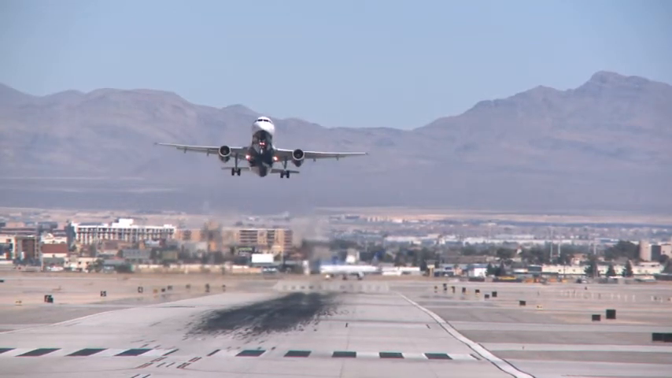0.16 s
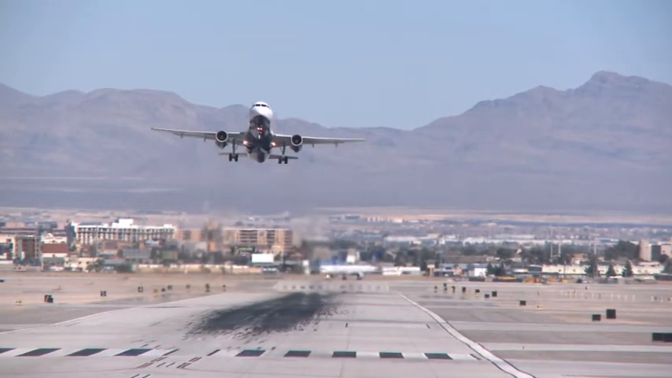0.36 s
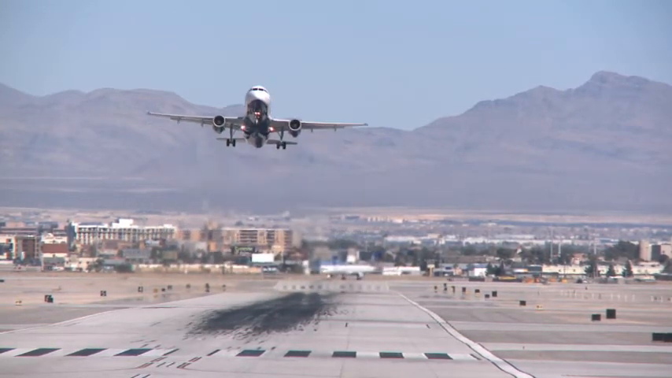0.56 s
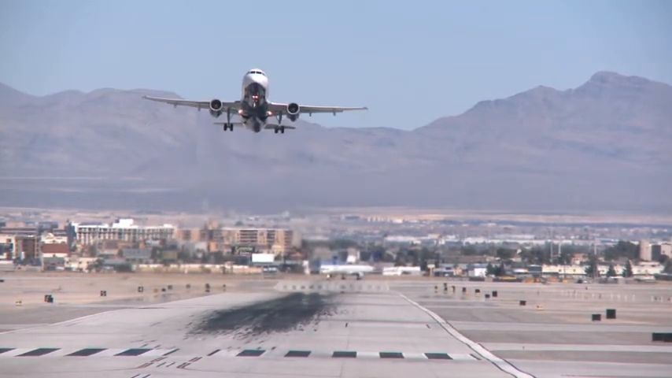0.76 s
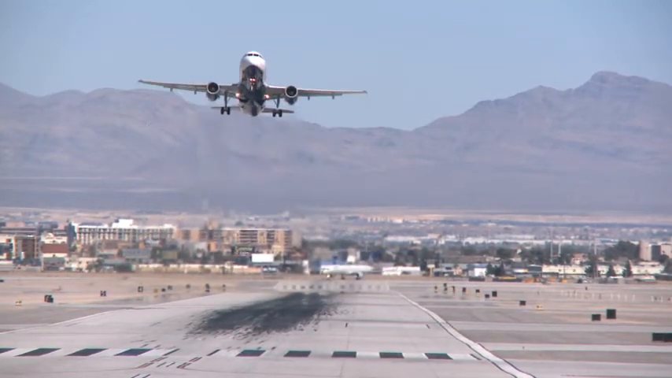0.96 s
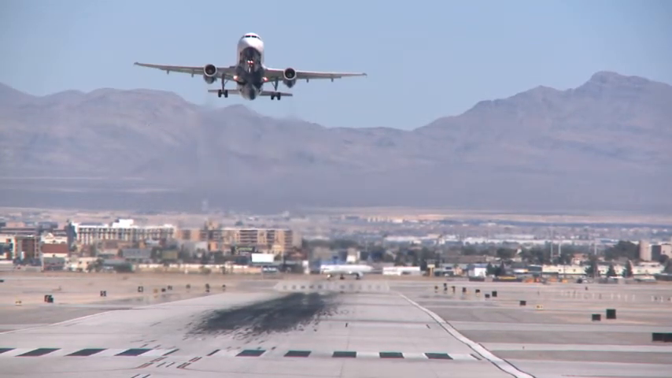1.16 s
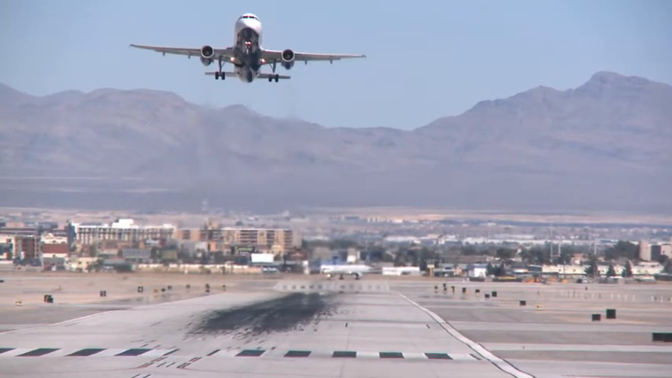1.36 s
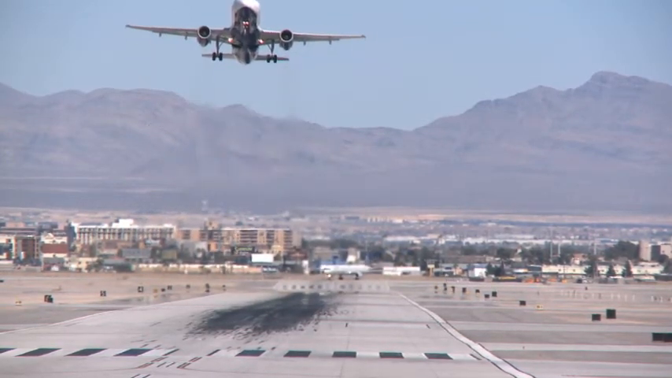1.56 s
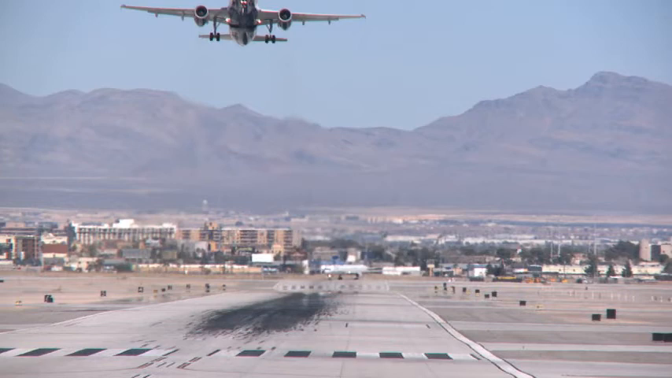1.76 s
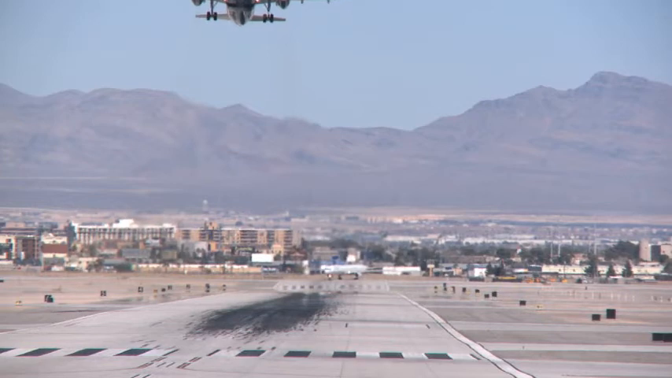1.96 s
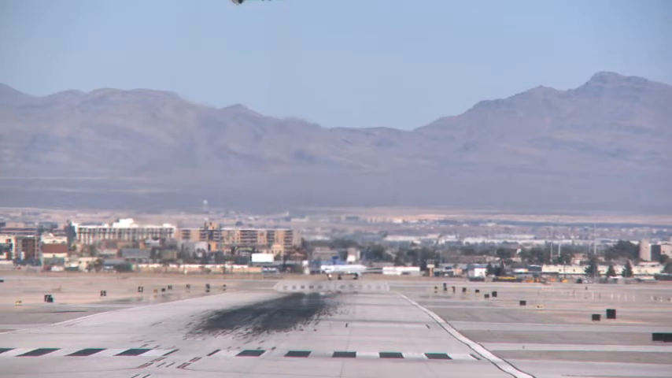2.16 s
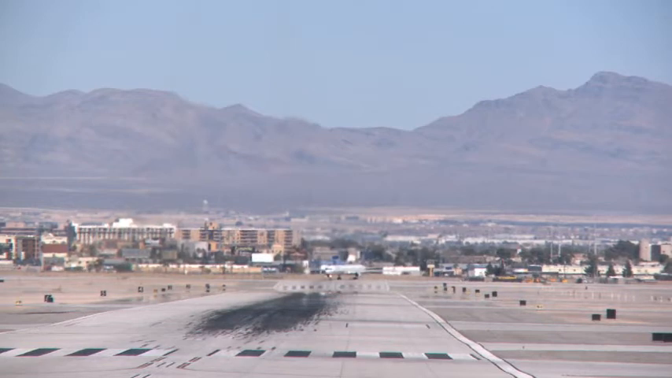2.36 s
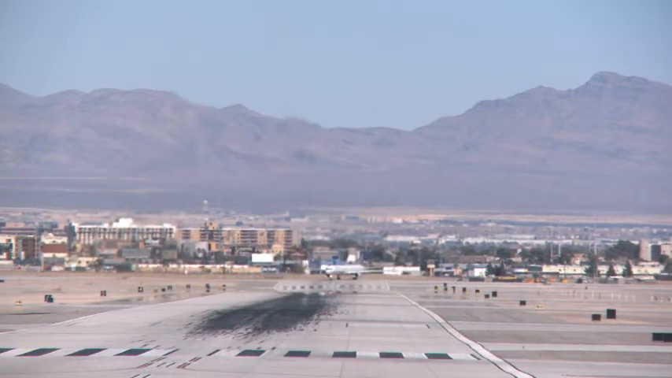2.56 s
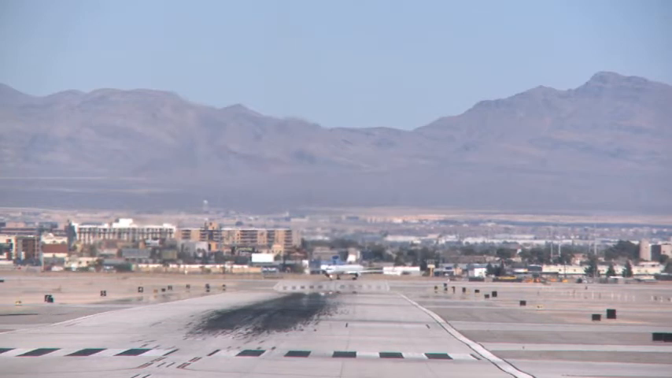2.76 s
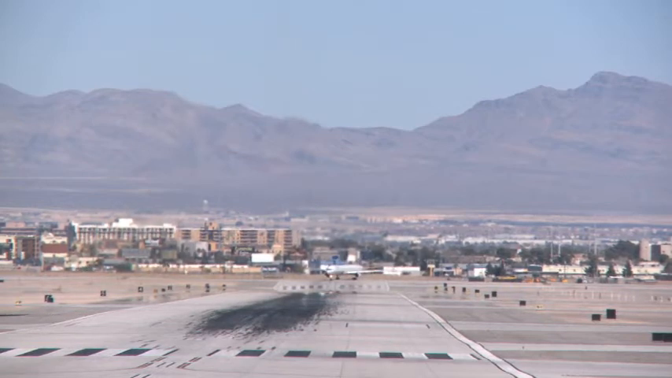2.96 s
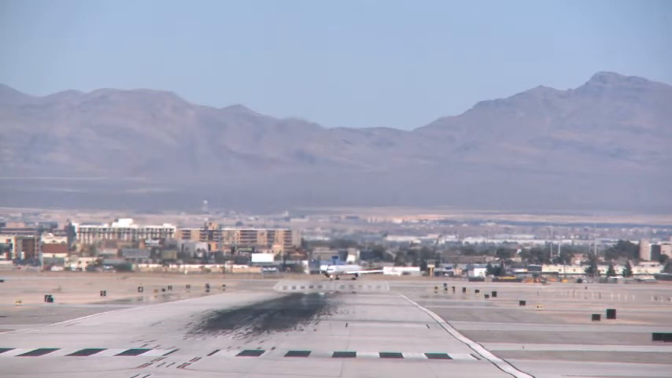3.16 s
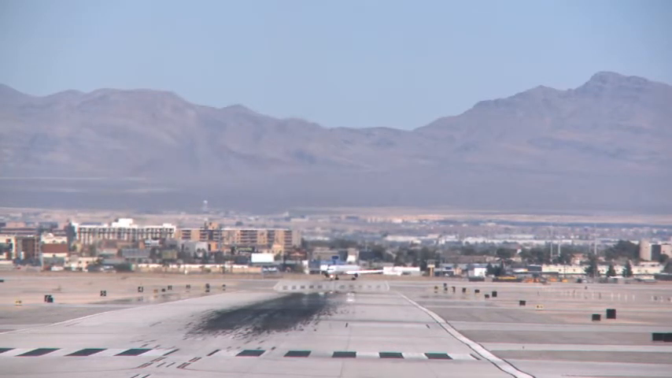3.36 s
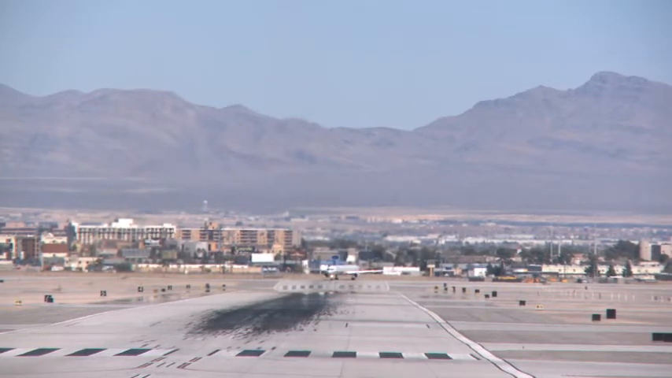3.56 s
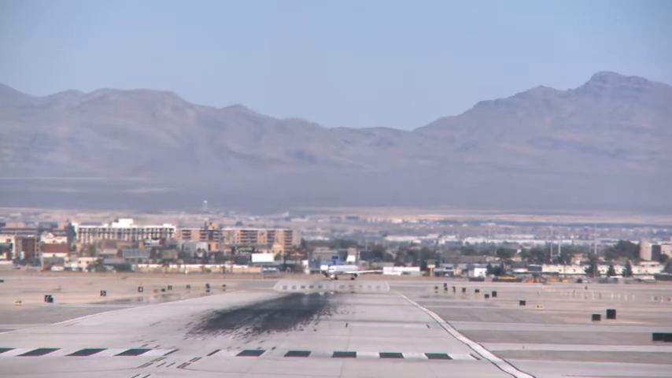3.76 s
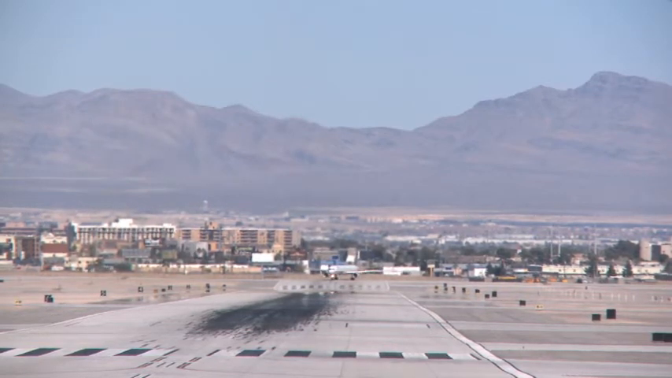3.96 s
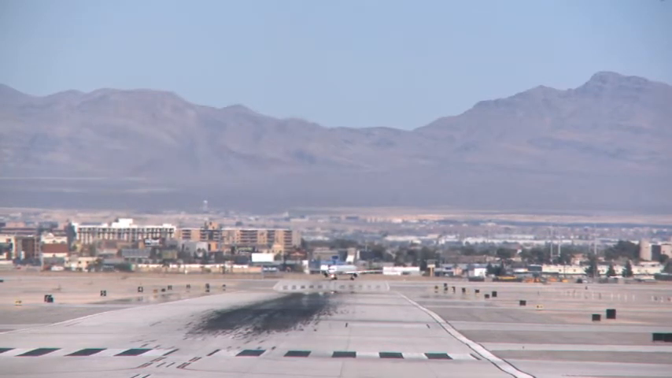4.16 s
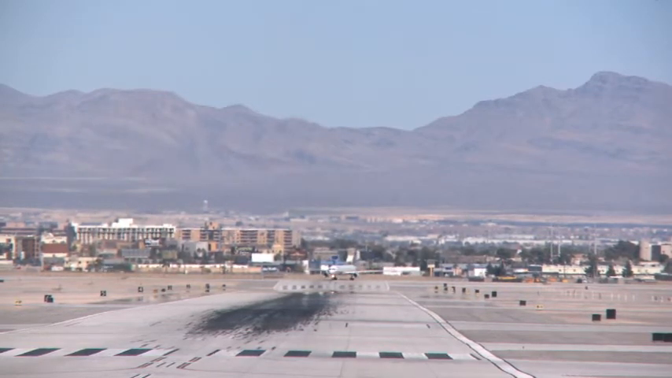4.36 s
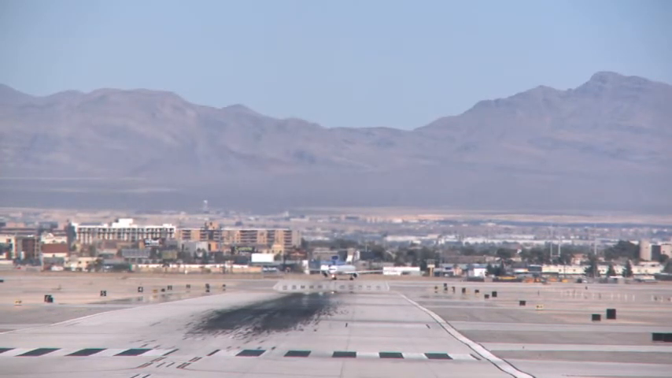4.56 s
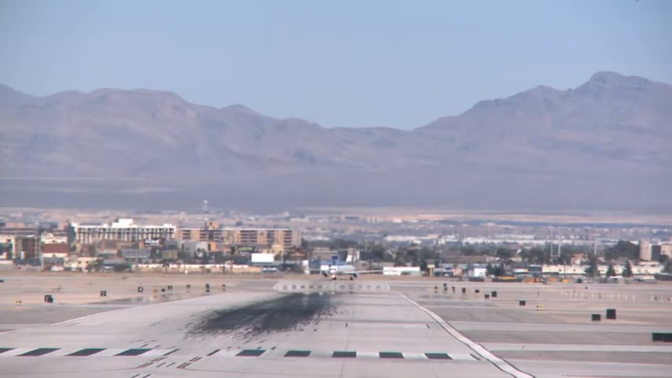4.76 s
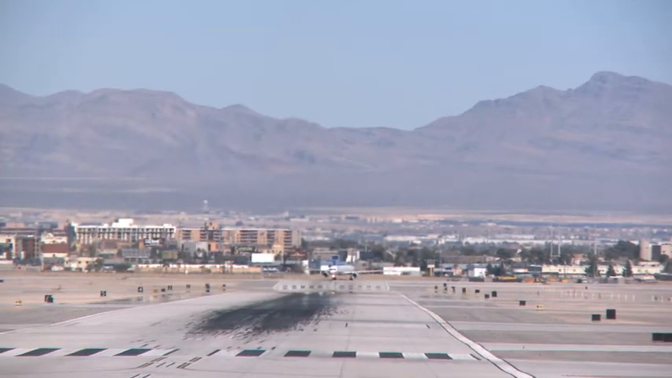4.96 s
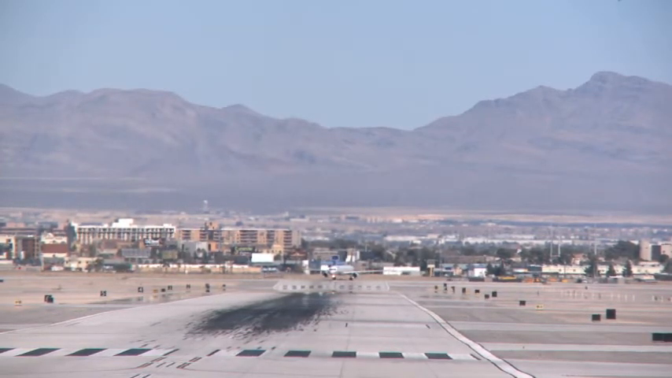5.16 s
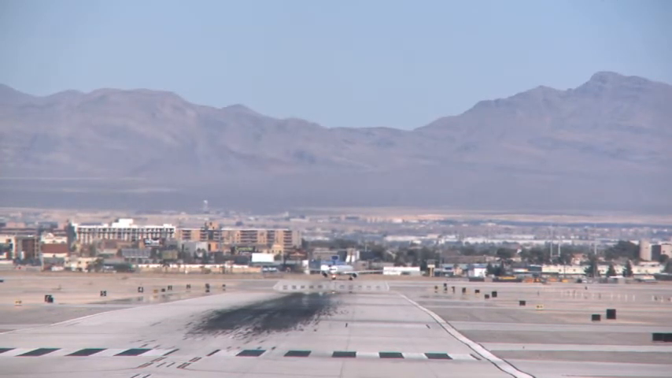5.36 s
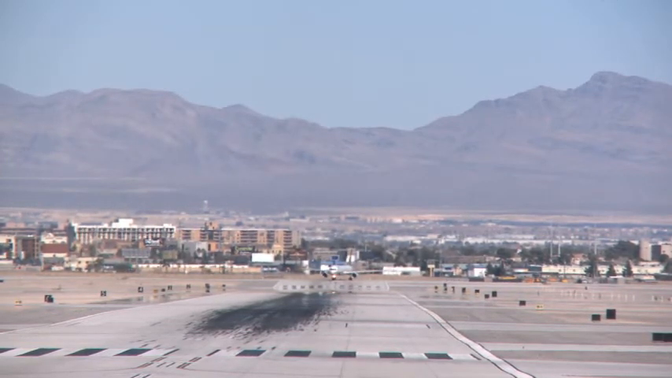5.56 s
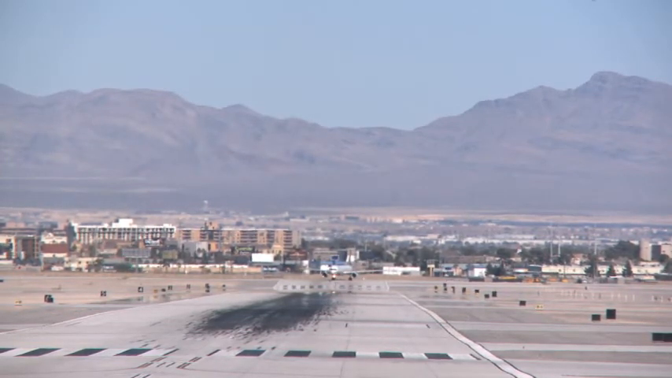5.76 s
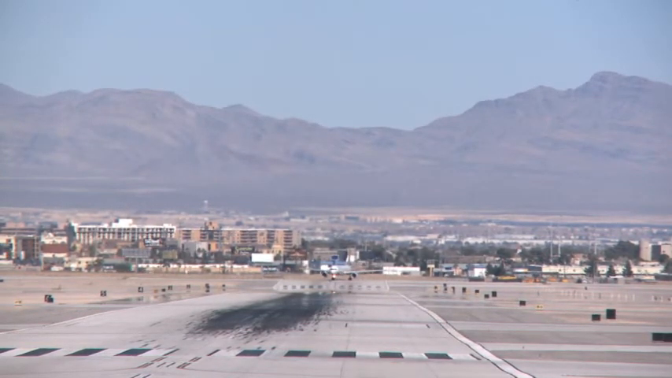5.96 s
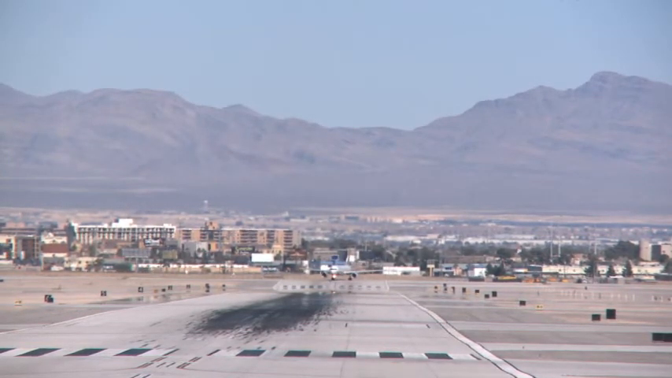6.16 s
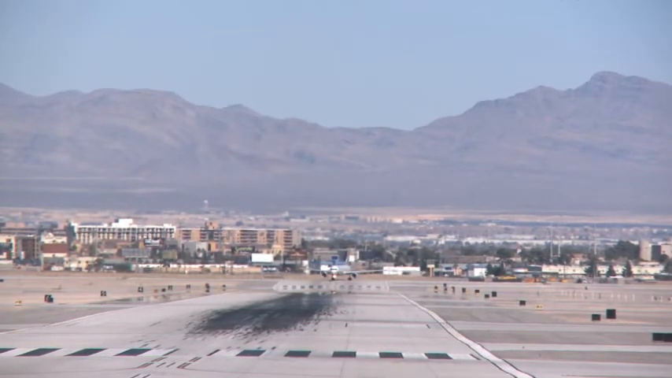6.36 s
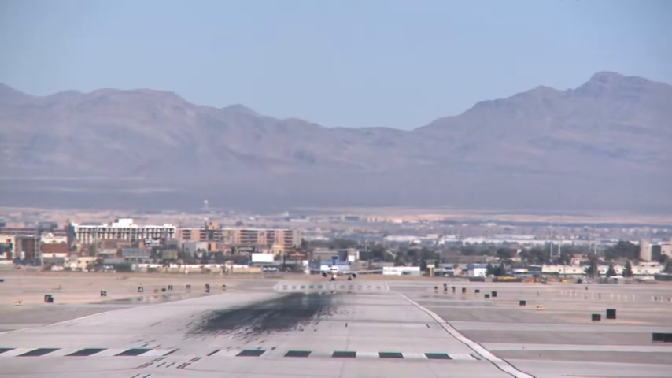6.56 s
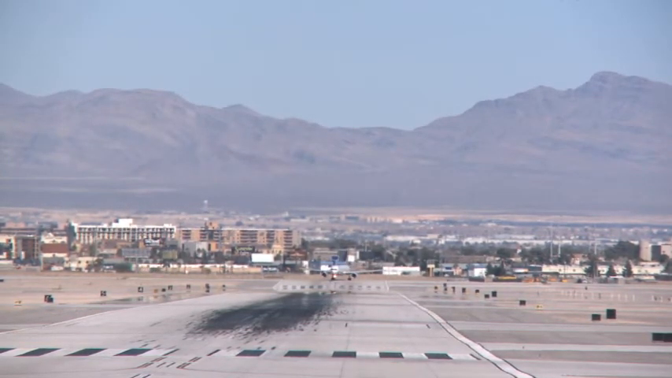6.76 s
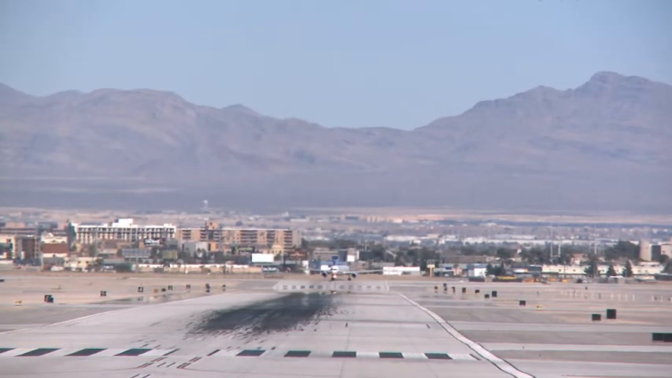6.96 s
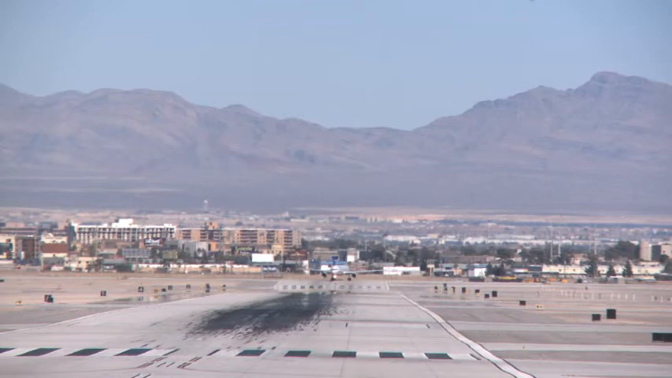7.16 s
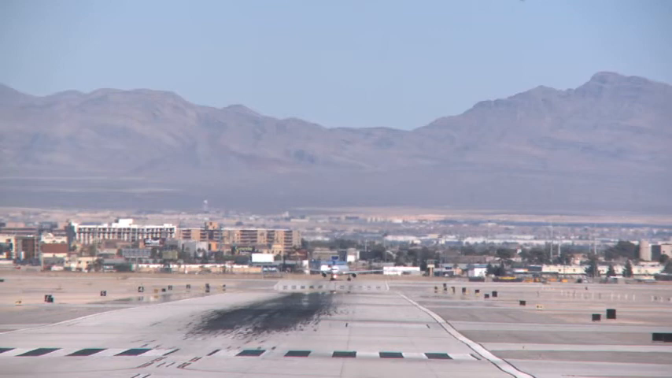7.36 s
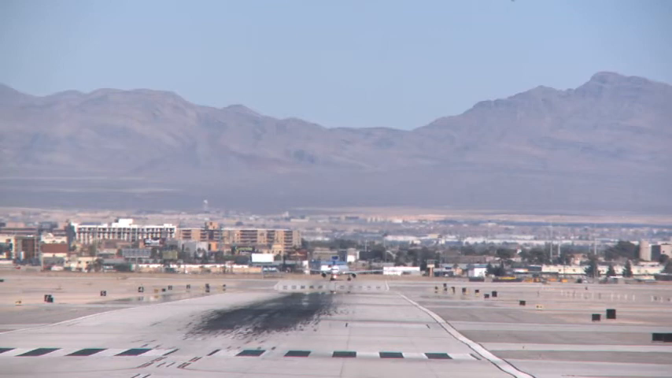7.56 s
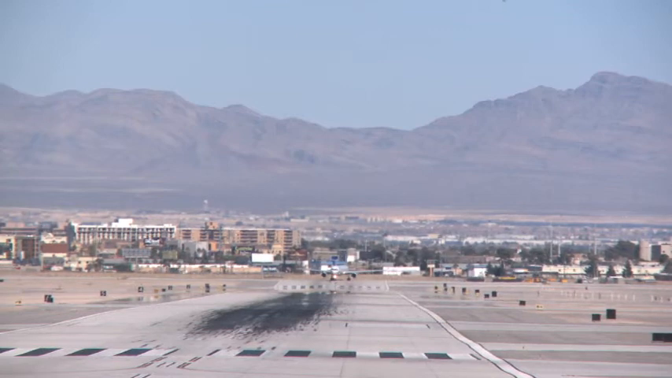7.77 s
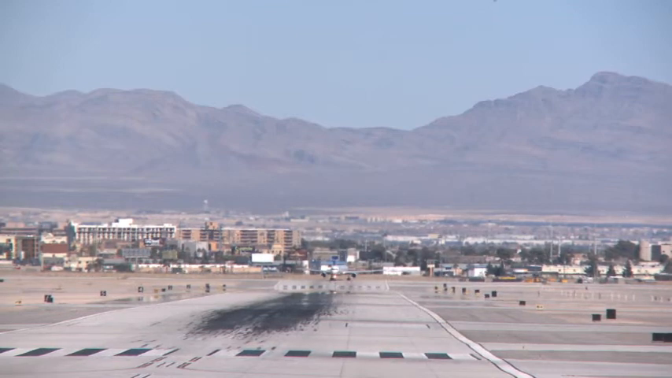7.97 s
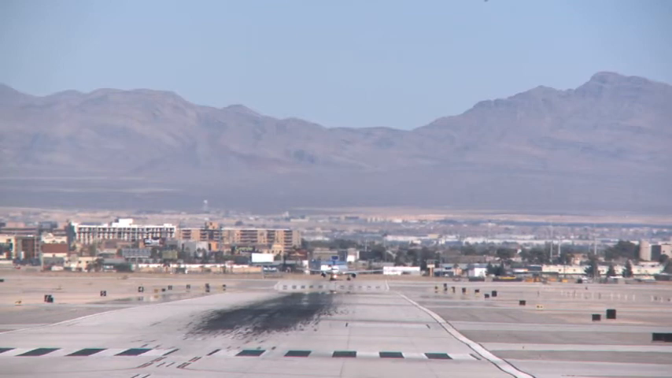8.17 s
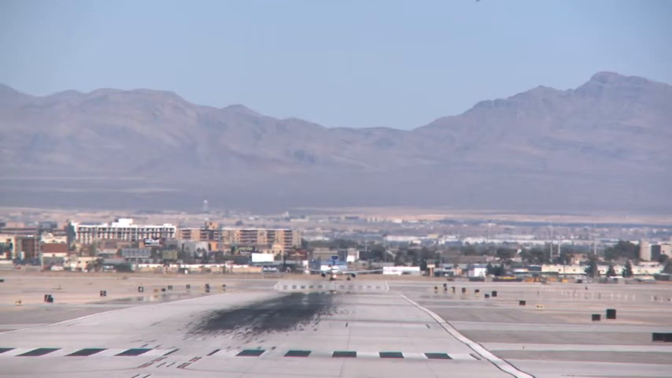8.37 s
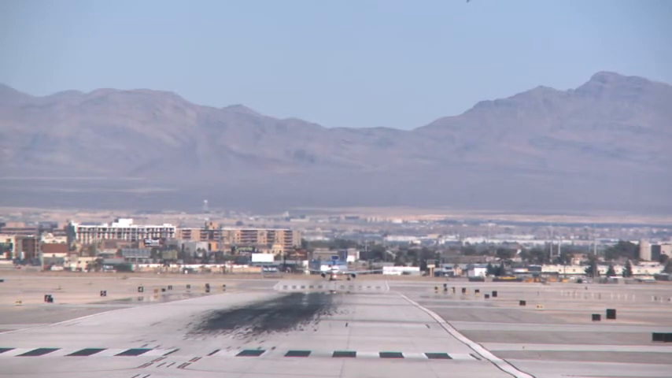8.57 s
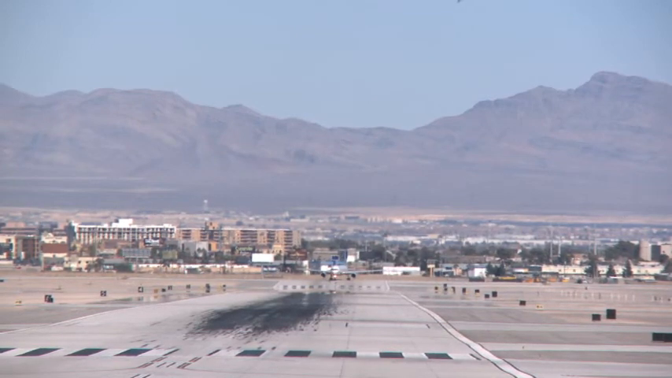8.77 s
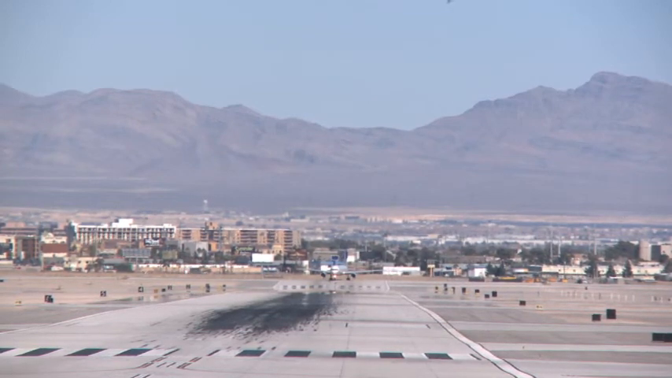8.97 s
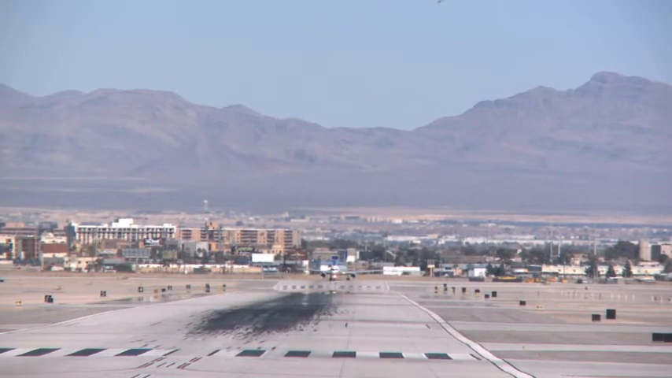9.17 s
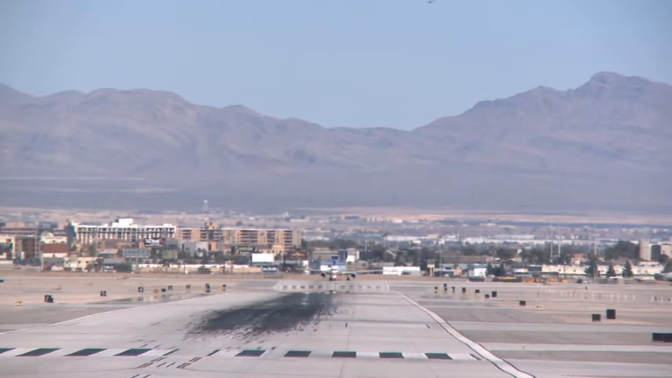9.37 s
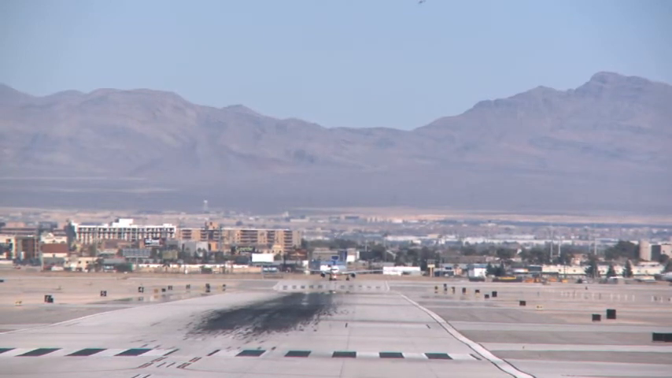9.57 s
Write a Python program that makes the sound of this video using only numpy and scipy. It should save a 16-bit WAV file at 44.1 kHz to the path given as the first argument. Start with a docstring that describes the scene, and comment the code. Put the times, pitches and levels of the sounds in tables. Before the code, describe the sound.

Broad hissing jet noise with a hollow, mostly falling sweep passes over an open runway, darkening and growing into a heavy, low roar.

```python
"""Airliner climbing out overhead

A twin-engine jet lifts off at take-off thrust; its deep exhaust swells under the bright rush of the fans.
The jet noise is filtered random noise, heard direct and off the ground: the comb between them mostly sweeps down.
Sine tones make the faint buzz-saw, a whistle and a low drone; slow random motion makes them waver.
Behind it lie a flickering treble, a light breeze, a few bird chirps and faint microphone hiss."""
import sys
import numpy as np
from scipy import signal
from scipy.fft import rfft, irfft
from scipy.io import wavfile
from scipy.ndimage import uniform_filter1d

SR = 44100
rng = np.random.default_rng(int(sys.argv[2]) if len(sys.argv) > 2 else 0)


def int16_out(signal):
    """Quantize to a 16-bit WAV file."""
    q = np.round(np.clip(np.atleast_2d(signal).T, -1, 1) * 32767)
    wavfile.write(sys.argv[1], SR, q.astype(np.int16))


N = 423801  # samples
SIZE, HOP = 2048, 512  # analysis window and frame step [samples]
TIME = np.arange(N) / SR
FRAME_S = np.arange(N // HOP + 3) * HOP / SR
BIN_HZ = np.fft.rfftfreq(SIZE, 1 / SR)

# Spectra give relative density only; a level curve sets the loudness.
# Exhaust level as the tail turns to the listener: (time [s], roar [dB], rumble [dB])
EXHAUST_LEVEL = [(0.0, -38.5, -32.5), (1.02, -41, -33), (3.04, -42, -33.5), (4.16, -42, -32.0),
                 (5.14, -33.5, -32), (5.54, -30, -30.5), (6.3, -31, -26.4), (6.59, -29, -28),
                 (7.3, -28, -30), (7.99, -33.0, -29), (8.58, -29, -29), (9.12, -24, -23), (9.6, -23.5, -27)]
# Spectrum of the largest plume eddies: (frequency [Hz], density [dB per Hz])
RUMBLE_SPECTRUM = [(15, -24), (30, 2), (42, 1.5), (55, 0.5), (80, 0), (110, -3), (160, -7), (230, -11),
                   (330, -23.5), (500, -39), (1000, -79)]
# Spectrum of the smaller plume eddies: (frequency [Hz], density [dB per Hz])
ROAR_SPECTRUM = [(60, -34), (130, -6), (210, -3), (280, -0.5), (360, -1.5), (460, -3.5), (600, -10),
                 (800, -13), (1200, -23), (2500, -51.5), (5000, -83.5)]
# Spectral slide from Doppler shift and plume angle: (time [s], roar frequency [factor], rush frequency [factor])
SPECTRUM_SLIDE = [(0, 2.23, 1.18), (.7, 1.97, 1.09), (1.8, 0.79, 0.95), (2.6, 1, 1.08), (3.6, 1.3, 1.08),
                  (4.66, 1.5, 1.03), (6.35, 1.87, 1.01), (6.8, 1.13, 1.07), (7.6, 1.02, 1.065),
                  (9.6, 0.85, .96)]
# Fan noise level: (time [s], rush [dB], bright edge [dB])
FAN_LEVEL = [(0.0, -38, -53), (0.44, -35.5, -48), (1.35, -32.6, -45.5), (2.21, -30, -41.5),
             (2.82, -31, -39.5), (3.03, -32.8, -47), (3.17, -32.5, -42.4), (4.31, -36, -44.5),
             (4.65, -34.2, -42.5), (6.25, -39.5, -48.5), (6.79, -33.5, -45.5), (7.5, -32.5, -40.5),
             (8.28, -32.5, -40.9), (9.6, -30, -42.5)]
# Spectrum of the broad fan rush: (frequency [Hz], density [dB per Hz])
RUSH_SPECTRUM = [(200, -41), (450, -5), (620, 1), (760, 4), (1000, 2), (1250, -2), (1600, -2), (2000, -12),
                 (2400, -30), (3000, -48), (5000, -61)]
# Spectrum of the rush's bright edge: (frequency [Hz], density [dB per Hz])
EDGE_SPECTRUM = [(900, -46), (1700, -1.5), (2150, 2.5), (2450, 2), (2700, -3), (2950, -11), (3130, -16),
                 (3350, -9.5), (3700, -19), (4000, -18), (4400, -32), (4800, -34.5), (6500, -62)]
# Spectrum of the inlet whine: (frequency [Hz], density [dB per Hz])
WHINE_SPECTRUM = [(2800, -30), (3250, -14.5), (3550, 3.5), (3850, -5.5), (4400, -30), (5200, -42)]
# Inlet whine level: (time [s], level [dB])
WHINE_CURVE = [(0, -68), (.6, -60.5), (1.1, -64.5), (2.47, -61), (3, -78), (4.9, -72), (6.2, -64),
               (7.5, -69), (9.6, -73)]
# Fan shaft as heard: (time [s], rate [Hz], leading tenth order [dB], other low orders [dB])
SHAFT_CURVE = [(0, 77, -61, -71), (4.8, 76.3, -67, -51), (5.7, 74.9, -42, -54), (6.7, 75.24, -41.5, -45),
               (7.5, 75.06, -43, -51), (8.55, 72.87, -56, -48), (8.87, 73.26, -35, -38),
               (9.15, 73, -44, -47), (9.4, 72.55, -34.5, -33), (9.6, 73.2, -40, -41)]
# The other low buzz-saw orders: (multiple of shaft rate [factor], offset [dB])
BUZZ_ORDERS = [(3, -3.5), (4.3, 0.5), (9.04, 1)]
# Low drone: (time [s], pitch [Hz], level [dB])
DRONE_CURVE = [(0, 73.5, -53), (.7, 73.5, -38), (1.6, 73.6, -41.5), (3.8, 71.8, -56), (4.5, 55.6, -60),
               (5.2, 55.94, -30), (6.4, 55.74, -49), (9.6, 52.4, -41)]
# Ground echo: (time [s], first comb peak = 1 / delay [Hz], strength [0-1])
GROUND_ECHO = [(0.0, 1700, 0.43), (0.61, 1600, 0.64), (1.16, 1400, 0.95), (1.65, 1055, 0.7),
               (2.01, 1000, 0.73), (2.84, 873, 0.55), (3.33, 1082.0, 0.5), (4.01, 1027.0, 0.1),
               (4.43, 332.0, 0.12), (5.59, 398.0, 0.4), (6.37, 404, 0.17), (7.52, 367.6, 0.43),
               (8.23, 360.6, 0), (9.6, 243.0, 0.83)]
# Treble level: (time [s], thin hiss [dB], airy top [dB])
TREBLE_LEVEL = [(0.0, -77, -77), (0.38, -70.5, -76), (1.05, -67, -77), (1.54, -65.8, -65),
                (1.93, -74.4, -70), (2.42, -66.3, -64), (3.02, -80.8, -70), (3.63, -85.4, -73.2),
                (4.42, -75.2, -69), (4.71, -69.4, -63), (5.0, -73, -70), (5.48, -70, -65.5),
                (6.5, -73.5, -74.4), (7.75, -67.5, -74), (8.58, -66.6, -65), (9.26, -71.5, -72),
                (9.6, -70, -67.3)]
# Spectrum of the thin hiss: (frequency [Hz], density [dB per Hz])
HISS_SPECTRUM = [(3000, -20), (4400, 4), (5000, -14), (5600, -6), (6100, 1), (6700, 1), (7400, -2),
                 (8200, -10), (9300, -17), (12000, -43)]
# Spectrum of the airy top: (frequency [Hz], density [dB per Hz])
TOP_SPECTRUM = [(4850, -5), (5250, 6), (5550, 5.5), (5900, -8.5), (7600, -5.5), (8400, 4.5), (9300, -3),
                (10300, 3.5), (11000, -1), (11700, -7), (13500, -5.5), (14800, -7), (16000, -5.5)]
# Spectrum of wind on the microphone: (frequency [Hz], density [dB per Hz])
BREEZE_SPECTRUM = [(8, -23), (22, -13.5), (35, 3), (55, -23.5), (120, -39), (400, -86.5)]
# Bird chirps: (start time [s], length [s], start pitch [Hz], end pitch [Hz], peak level [dB])
BIRD_CHIRPS = [(6.99, .025, 5050, 4700, -65), (7.005, .04, 4300, 3300, -56), (7.58, .035, 4200, 4750, -64),
               (8.124, .05, 3880, 4950, -63)]
# Spectrum of the microphone's own hiss: (frequency [Hz], density [dB per Hz])
SELF_NOISE_SPECTRUM = [(7000, -12), (11000, -4), (12200, -7.5), (13500, -2), (15500, 1)]

# Rough ground blurs the higher comb teeth; at grazing angles (first peak above MIRROR_HZ) it acts as a mirror
ROUGH_TEETH, MIRROR_HZ, MIRROR_POWER = 1.7, 1090, 3.4
# The high whistle grows as the aircraft nears, up to its overhead level
WHISTLE_DB, WHISTLE_DB_PER_S, OVERHEAD_S = -48, 10, 9.6
BREEZE_START_DB, BREEZE_DB_PER_S = -41, 0.67
SELF_NOISE_DB = -76.5


def amp(db):
    """Decibels to gain."""
    return 10 ** (np.asarray(db) / 20)


def evened(x):
    """Scales to rms 1."""
    return x / np.sqrt(np.mean(abs(x) ** 2) + 1e-20)


def follow(rows, t):
    """The columns of a curve table at times t."""
    s, *columns = np.transpose(rows)
    return [np.interp(t, s, c) for c in columns]


def colour(points, hz):
    """Gain of a spectrum, joined on a log-frequency axis."""
    f, db = np.transpose(points)
    return amp(np.interp(np.log(hz + 1), np.log(f + 1), db))


def wander(rate_hz):
    """Slow random motion of rms 1, up to about rate_hz."""
    count = N // HOP * 2
    hz = np.fft.rfftfreq(count, HOP / SR)
    spectrum = rfft(rng.standard_normal(count)) / (1 + (hz / rate_hz) ** 4)
    return evened(irfft(spectrum)[:len(FRAME_S)])


def eddies(frames_count, bins_count):
    """Random patches over time and frequency, rms 1."""
    field = rng.standard_normal((len(FRAME_S), len(BIN_HZ)))
    over_time = uniform_filter1d(field, frames_count, 0)
    return evened(uniform_filter1d(over_time, bins_count, 1))


def turbulence(shape, level_db, patchy_db):
    """Noise of one colour on a level curve, broken into patches over time and frequency."""
    gain = shape * amp(patchy_db * eddies(frames_count=9, bins_count=14))
    # level out the slow power changes so that the level curve alone sets them
    gain = gain / np.sqrt(uniform_filter1d((gain ** 2).mean(1), size=21))[:, None]
    noise = rng.standard_normal(gain.shape) + 1j * rng.standard_normal(gain.shape)
    sound = signal.istft((noise * gain).T, nperseg=SIZE, noverlap=SIZE - HOP)[1][:N]
    return evened(sound) * amp(np.interp(TIME, FRAME_S, level_db))


def tone(hz, level_db, waver_hz, fade_db, rate_hz):
    """A sine whose pitch and strength waver on the way through the air."""
    pitch = np.interp(TIME, FRAME_S, hz + waver_hz * wander(rate_hz))
    level = np.interp(TIME, FRAME_S, level_db + fade_db * wander(rate_hz))
    return np.sqrt(2) * amp(level) * np.sin(2 * np.pi * np.cumsum(pitch) / SR)


def exhaust(comb):
    """The largest plume eddies rumble; smaller ones roar and surge slightly, their spectrum sliding."""
    roar_db, rumble_db = follow(EXHAUST_LEVEL, FRAME_S)
    roar_slide, _ = follow(SPECTRUM_SLIDE, FRAME_S)
    surge_db = 0.19 * wander(rate_hz=9)
    rumble = turbulence(colour(RUMBLE_SPECTRUM, BIN_HZ) * comb, rumble_db, patchy_db=0.5)
    roar_shape = colour(ROAR_SPECTRUM, BIN_HZ / roar_slide[:, None])
    roar = turbulence(roar_shape * comb, roar_db + surge_db, patchy_db=1.5)
    return rumble + roar


def fans(comb):
    """Broad fan noise, its bright edge and the inlet whine, fluttering together in the moving air."""
    rush_db, edge_db = follow(FAN_LEVEL, FRAME_S)
    _, rush_slide = follow(SPECTRUM_SLIDE, FRAME_S)
    whine_db, = follow(WHINE_CURVE, FRAME_S)
    flutter_db = 0.25 * wander(rate_hz=12)
    rush_shape = colour(RUSH_SPECTRUM, BIN_HZ / rush_slide[:, None])
    rush = turbulence(rush_shape * comb, rush_db + flutter_db, patchy_db=0.6)
    edge = turbulence(colour(EDGE_SPECTRUM, BIN_HZ) * comb, edge_db + flutter_db, patchy_db=1.07)
    whine = turbulence(colour(WHINE_SPECTRUM, BIN_HZ), whine_db + flutter_db, patchy_db=3.5)
    return rush + edge + whine


def buzz_saw():
    """Shock waves from the fan tips sound at or near multiples of the shaft rate."""
    shaft_hz, lead_db, low_db = follow(SHAFT_CURVE, FRAME_S)
    whistle_db = WHISTLE_DB - WHISTLE_DB_PER_S * abs(OVERHEAD_S - FRAME_S)
    lead = tone(10 * shaft_hz, lead_db, waver_hz=2.42, fade_db=3.5, rate_hz=9.3)
    low = sum(tone(k * shaft_hz, low_db + db, waver_hz=0.331 * k, fade_db=3.5, rate_hz=7.8)
              for k, db in BUZZ_ORDERS)
    whistle = tone(33.4 * shaft_hz, whistle_db, waver_hz=14, fade_db=3, rate_hz=25)
    return lead + low + whistle


def drone():
    """A low unsteady sine within the rumble."""
    hz, level_db = follow(DRONE_CURVE, FRAME_S)
    return tone(hz, level_db, waver_hz=1.6, fade_db=2.5, rate_hz=3.0)


def ground_comb(soft_order_share=0.29, second_bounce=0.18, howl_db=2.2, howl_width=0.18):
    """Direct sound interferes with its ground echo and a weaker one twice as late; higher teeth blur."""
    first_hz, strength = (c[:, None] for c in follow(GROUND_ECHO, FRAME_S))
    clear_teeth = ROUGH_TEETH + (first_hz / MIRROR_HZ) ** MIRROR_POWER
    tooth = BIN_HZ / first_hz
    # share of the echo that still keeps step with the direct sound
    likeness = np.exp(-(tooth / clear_teeth) ** 2) * (1 - np.exp(-tooth / soft_order_share))
    echo = np.clip(strength, 0, .95)
    lag = echo * np.exp(-2j * np.pi * tooth)
    in_step = abs(1 + lag + second_bounce * lag ** 2) ** 2
    scattered = 1 + echo ** 2 + (second_bounce * echo ** 2) ** 2
    # the first tooth stands out as a howl
    howl = amp(howl_db * echo * np.exp(-((tooth - 1) / howl_width) ** 2))
    return np.sqrt(likeness * in_step + (1 - likeness) * scattered) * howl


def treble():
    """The faint treble that survives the distance: two noise bands flicker together, their colour drifting."""
    hiss_db, top_db = follow(TREBLE_LEVEL, FRAME_S)
    flicker_db = 0.9 * wander(rate_hz=12)
    drift = amp(1.6 * eddies(frames_count=50, bins_count=40))
    hiss = turbulence(colour(HISS_SPECTRUM, BIN_HZ) * drift, hiss_db + flicker_db, patchy_db=2.5)
    top = turbulence(colour(TOP_SPECTRUM, BIN_HZ) * drift, top_db + flicker_db, patchy_db=1.5)
    return hiss + top


def breeze():
    """Low noise of light wind buffeting the microphone, slowly freshening."""
    level_db = BREEZE_START_DB + BREEZE_DB_PER_S * FRAME_S
    return turbulence(colour(BREEZE_SPECTRUM, BIN_HZ), level_db, patchy_db=1.0)


def bird():
    """Short chirps of a small bird: sines with arched loudness and a glide that eases into its end pitch."""
    out = np.zeros(N)
    for s, length, start_hz, end_hz, db in BIRD_CHIRPS:
        part = np.linspace(0, 1, round(length * SR))
        pitch = start_hz + (end_hz - start_hz) * np.sin(np.pi / 2 * part)
        turns = np.cumsum(pitch) / SR
        chirp = amp(db) * np.sin(np.pi * part) * np.sin(2 * np.pi * turns)
        out[round(s * SR):][:len(part)] += chirp
    return out


def self_noise():
    """The microphone's own faint hiss at a constant level."""
    level_db = np.full(len(FRAME_S), SELF_NOISE_DB)
    return turbulence(colour(SELF_NOISE_SPECTRUM, BIN_HZ), level_db, patchy_db=1)


def scene():
    """The aircraft, the breeze and the bird at one microphone."""
    comb = ground_comb()
    aircraft = exhaust(comb) + fans(comb) + buzz_saw() + drone() + treble()
    background = breeze() + bird() + self_noise()
    return (aircraft + background)[None]


def record(dry):
    """The microphone's bass roll-off, very short fades at the ends and the recorder's band limit."""
    bass_cut = signal.butter(2, 14, "highpass", fs=SR, output="sos")
    thinned = signal.sosfilt(bass_cut, dry)
    ends = signal.windows.tukey(N, .0006)
    low_pass = signal.firwin(1023, 15750, window=("kaiser", 9), fs=SR)
    return signal.oaconvolve(thinned * ends, low_pass[None], "same")


dry = scene()
out = record(dry)
int16_out(out)
```